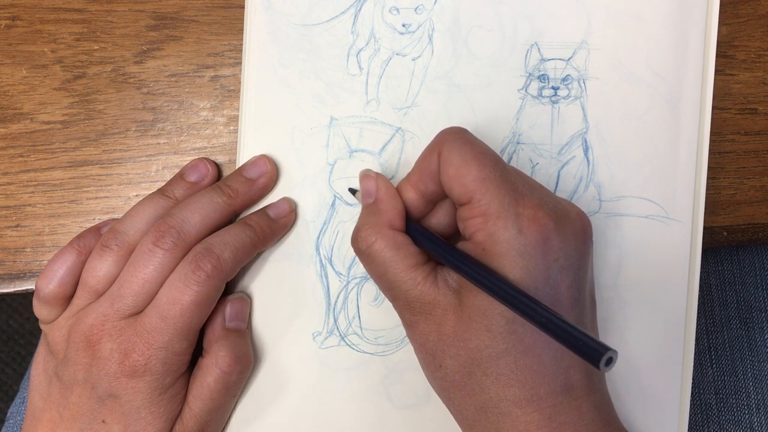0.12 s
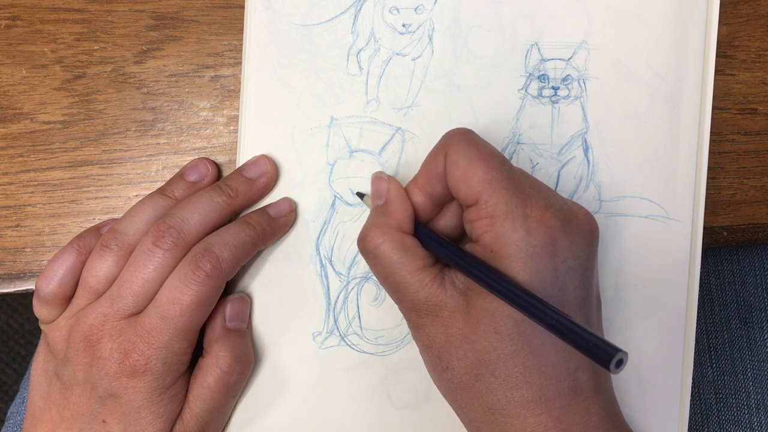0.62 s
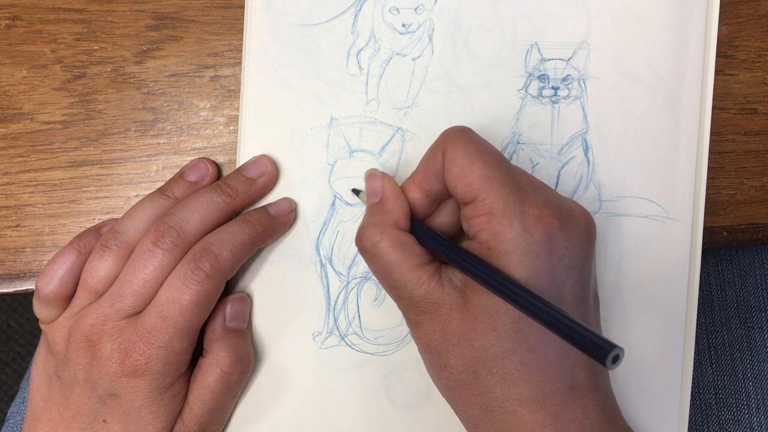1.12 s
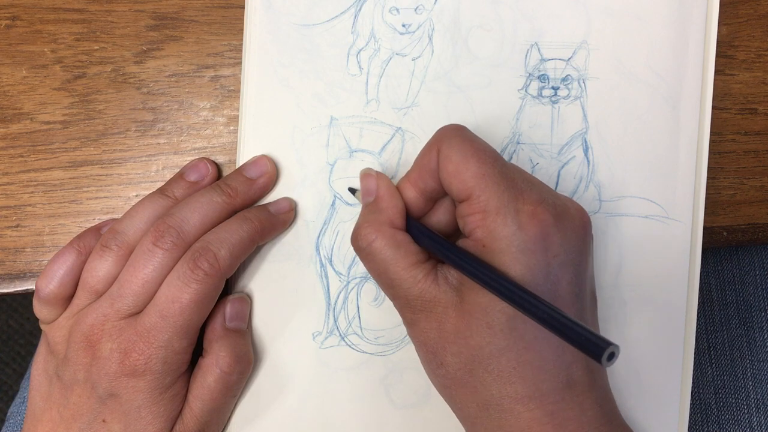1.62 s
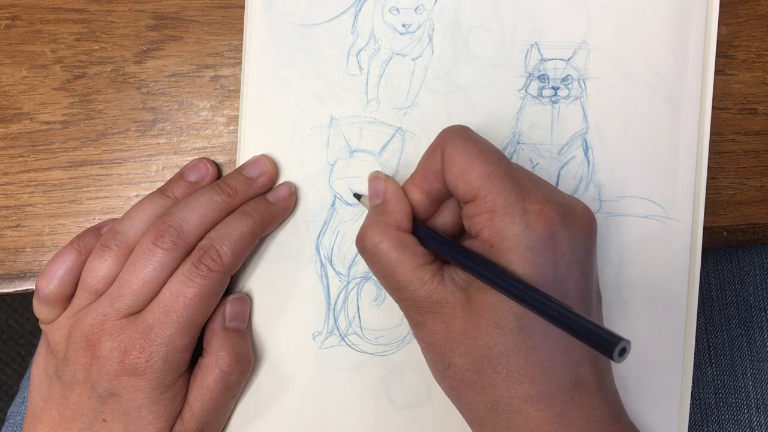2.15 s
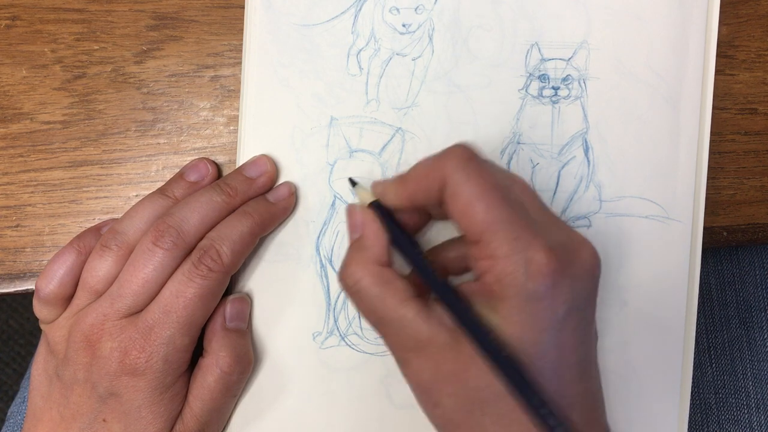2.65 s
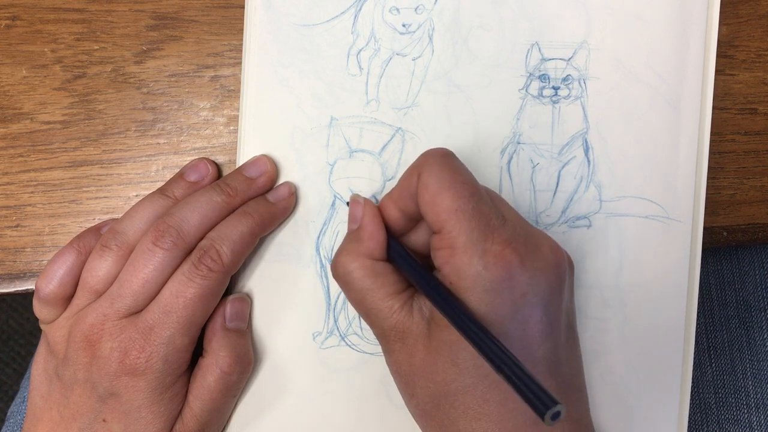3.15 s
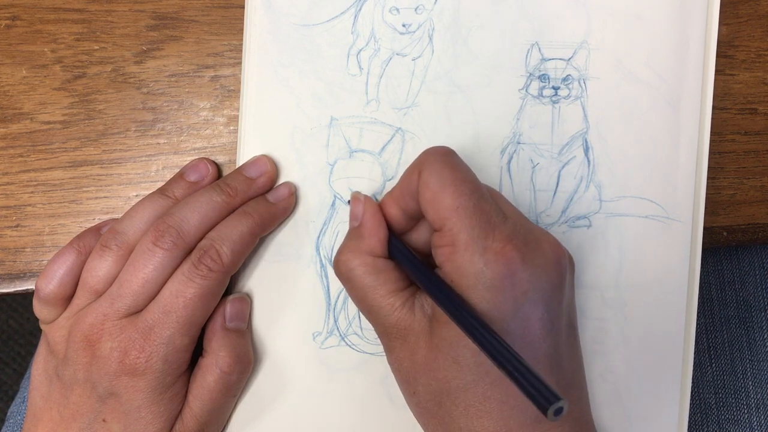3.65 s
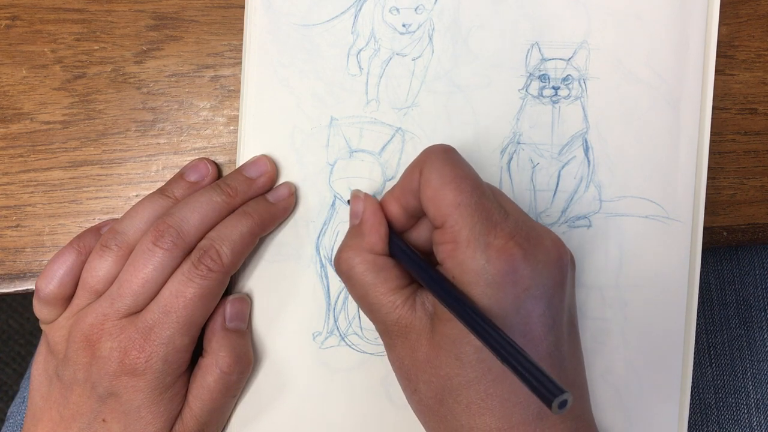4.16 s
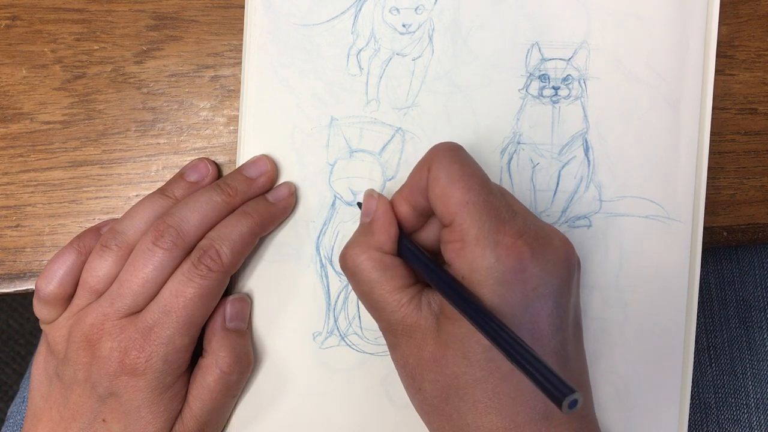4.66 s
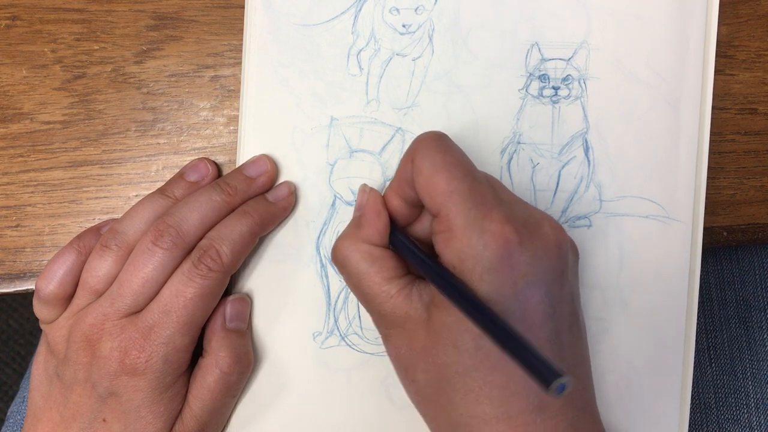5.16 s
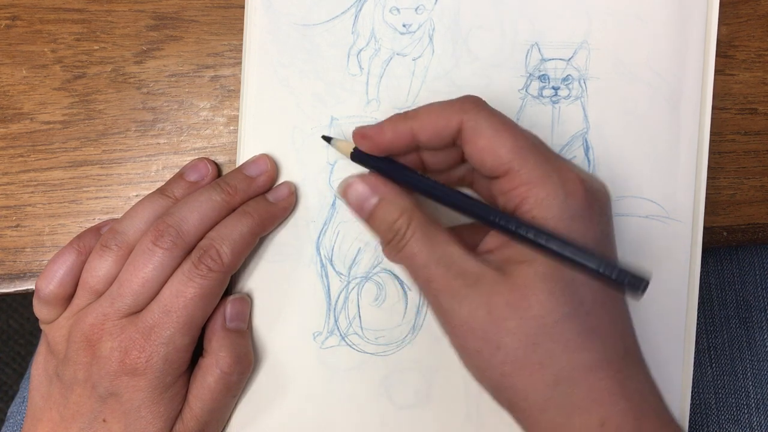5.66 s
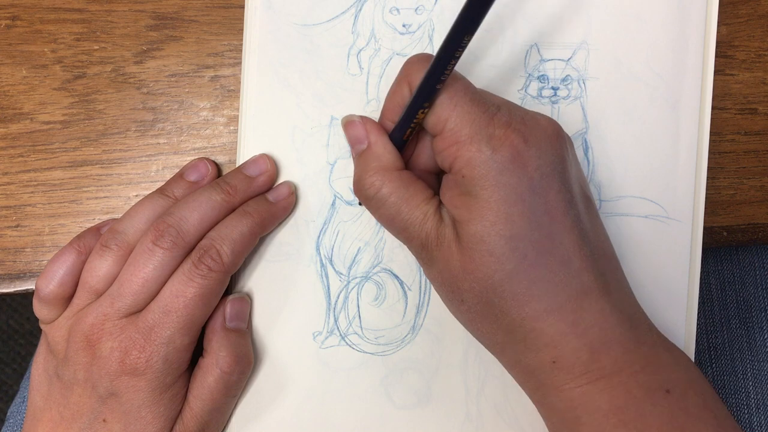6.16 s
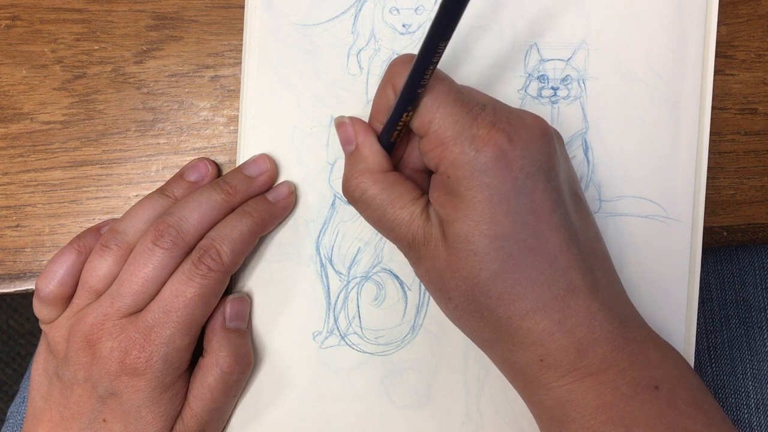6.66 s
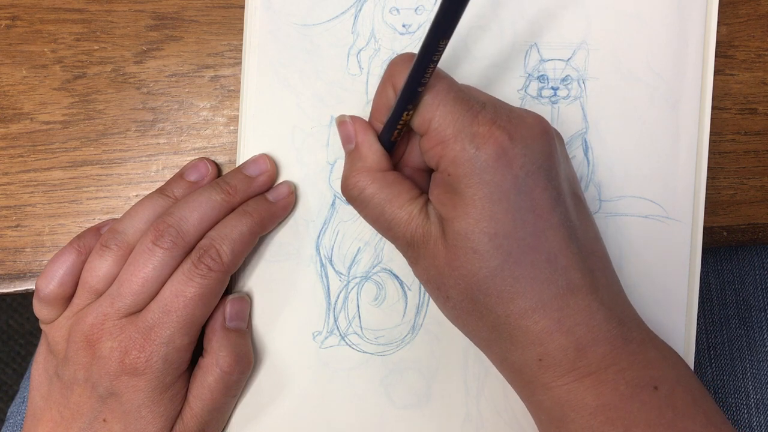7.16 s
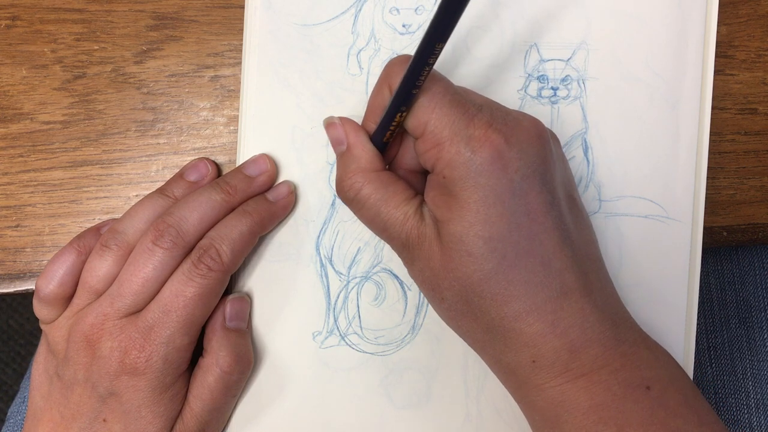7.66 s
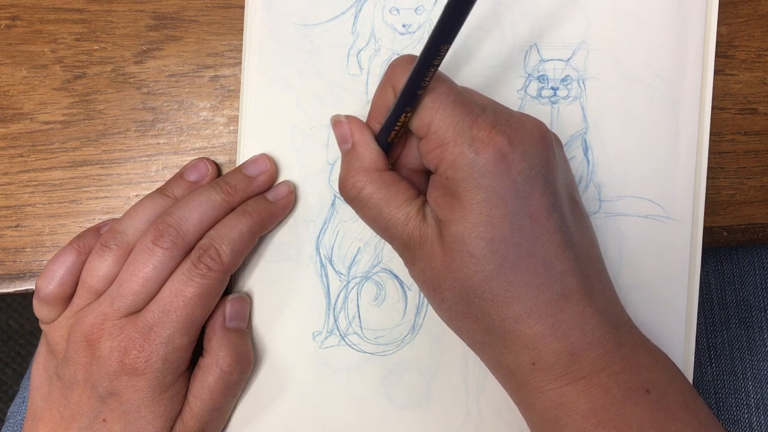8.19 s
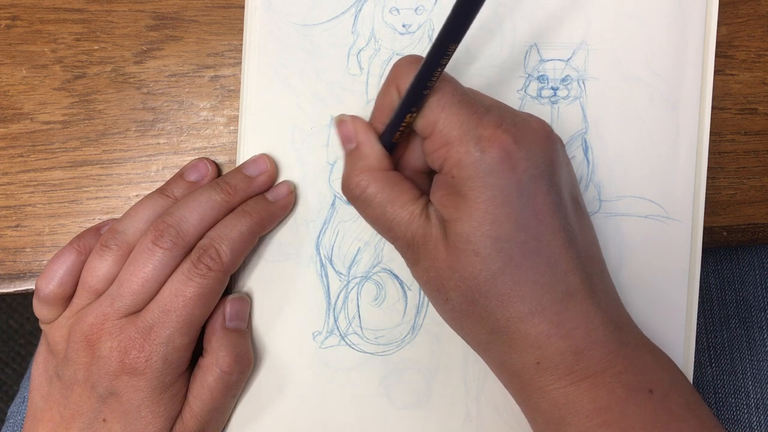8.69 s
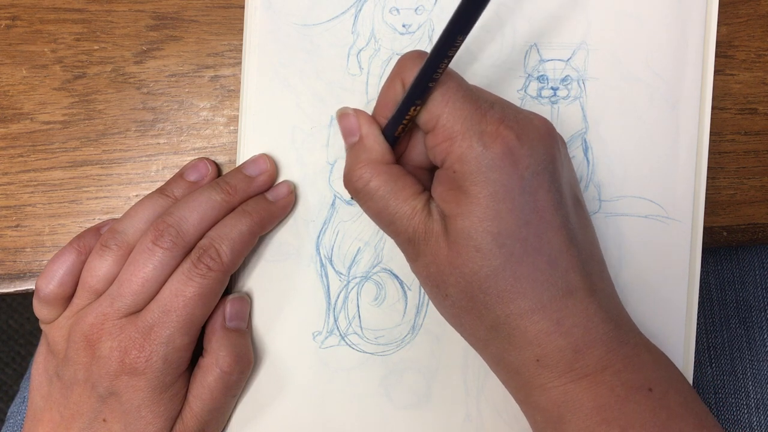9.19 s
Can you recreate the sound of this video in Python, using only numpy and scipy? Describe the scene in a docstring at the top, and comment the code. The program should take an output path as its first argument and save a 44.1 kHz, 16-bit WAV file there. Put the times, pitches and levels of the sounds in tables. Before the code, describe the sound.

A pencil makes faint dry scratches and tiny bright ticks on sketchbook paper over a steady, slowly beating low ventilation hum in a quiet room.

```python
"""A pencil sketches, a hand slides over the pad, then an eraser rubs; a phone is held just above the desk.
Rubs are dense random clicks, and the pencil's ticks single knocks with a short scrape; both excite resonances.
Ventilation fills the quiet room: a motor hum of steady sines that beats slowly, fan tones at multiples of
shaft speeds, a faint wandering whine of gliding partials, soft far pips, and duct rumble as shaped noise."""
import sys
import numpy as np
from scipy import signal
from scipy.fft import rfft, irfft, next_fast_len
from scipy.io import wavfile
from scipy.ndimage import uniform_filter1d

SR = 44100
rng = np.random.default_rng(int(sys.argv[2]) if len(sys.argv) > 2 else 0)


def put_to_file(sound):
    """Save the sound as 16-bit audio at rate SR, in the file named by the first command-line argument."""
    columns = np.atleast_2d(sound).T  # one column per channel
    safe = np.clip(columns, -1, 1)
    whole_steps = np.round(safe * 32767)
    wavfile.write(sys.argv[1], SR, whole_steps.astype(np.int16))


def makeup_ratio(level_db):
    """Linear amplitude ratio for a level in decibels (20 dB per factor of ten)."""
    decades = np.asarray(level_db, float) / 20
    return 10 ** decades


N = 410571
T = np.arange(N) / SR  # time in seconds


def ring(x, modes):
    """Modal resonance: a sum of band-pass filters, neighbours of opposite sign so that their skirts join."""
    out = 0
    for k, (hz, width_hz, db) in enumerate(modes):
        band = [hz - width_hz / 2, hz + width_hz / 2]
        sos = signal.butter(2, band, "band", fs=SR, output="sos")
        sign = (-1) ** k
        out = out + sign * makeup_ratio(db) * signal.sosfilt(sos, x)
    return out


def walk(rate):
    """Slow random modulation: levels held for 1 / rate seconds and smoothed twice, with a spread near 1."""
    hold = int(SR / rate)
    steps = np.repeat(rng.standard_normal(N // hold + 1), hold)
    smooth = uniform_filter1d(uniform_filter1d(steps, hold), hold)
    return 1.31 * smooth[:N]


def tone(hz, db):
    """Phase is the integral of frequency: a sine of db rms follows a pitch curve from a random phase."""
    cycles = np.cumsum(hz + 0 * T) / SR + rng.random()
    return np.sqrt(2) * makeup_ratio(db) * np.cos(2 * np.pi * cycles)


def rubs():
    """Stick-slip friction: pencil, hand or eraser catches on paper fibres in uneven clicks, louder when faster."""
    # Pencil strokes, a hand slide near 5.8-6.0 s, then probably eraser rubs.
    # Each row: middle in seconds, half length at half power in ms,
    # hiss level at the fastest point in dB rms, level of the pad body over the hiss in dB.
    rub_rows = [(.199, 33, -73.5, -2), (.368, 27, -71, -2), (.460, 19, -69, 0), (.630, 27, -78, -1),
                (.739, 26, -75, -2), (.885, 26, -73, -5), (1.035, 25, -74, -2), (1.124, 12, -77, 0),
                (1.221, 21, -75, -1), (1.385, 46, -75, 0), (1.514, 14, -73, -3), (1.616, 40, -78, -1),
                (1.750, 45, -72.5, -3), (1.797, 7.4, -65, 3), (2.144, 25, -73, -1), (2.238, 26, -76, -1),
                (2.337, 22, -69.5, -2), (2.631, 9, -59, -4), (2.670, 40, -67, -4), (2.755, 8, -64, -15),
                (2.785, 32, -69, -5), (2.850, 28, -66, -4.5), (3.202, 18, -67, -7), (3.331, 19, -66.5, -6),
                (3.442, 15, -69, -6), (3.549, 18, -68.5, -5), (3.737, 32, -68, -4.5), (3.903, 14, -71, -4),
                (4.000, 41, -70.5, -4), (4.138, 40, -73, -12), (4.237, 48, -76, -3), (4.431, 27, -71, -5),
                (4.683, 34, -74, -2), (4.831, 23, -74, -2), (5.128, 24, -76, -4), (5.421, 10, -61.5, -12),
                (5.699, 36, -73, -3.5), (5.820, 35, -66, -5), (5.911, 71, -60.5, -3), (6.035, 28, -73, 1),
                (6.311, 53, -75.5, -1), (6.678, 20, -70.5, -7), (6.792, 24, -75, -7), (6.954, 32, -72, -10),
                (7.235, 31, -70, -10), (7.415, 30, -72, -6), (7.699, 32, -73.5, -2), (8.017, 35, -73, -3),
                (8.367, 47, -71, -7), (8.425, 17, -71, -15), (9.002, 24, -74, -7), (9.159, 29, -71.5, -8)]
    # Hiss of the rubbed paper. Each row: centre in Hz, width in Hz, relative level in dB.
    hiss_modes = [(11500, 1500, 0), (12900, 1600, 0)]
    # Body of the rubbed pad. Each row: centre in Hz, width in Hz, relative level in dB.
    body_modes = [(3900, 2000, -9), (5700, 1300, -1), (7100, 1400, -6), (8600, 1400, 1), (9900, 1300, -3)]
    # Thin bright edge of the rubbing. Each row: centre in Hz, width in Hz, relative level in dB.
    edge_modes = [(14300, 1500, 0), (15500, 1200, 0)]
    fibres_per_s, fibre_spread_db = 15000, 1.5
    rise_share = 0.44  # the motion is fastest after this share of a rub
    steepness = 1.9  # power law of the motion's start and stop

    power = np.zeros((3, N))  # hiss, body, edge
    for middle_s, half_ms, hiss_db, body_db in rub_rows:
        near = slice(max(int((middle_s - .3) * SR), 0), int((middle_s + .3) * SR))
        rise_ms = 2 * half_ms * rise_share
        fall_ms = 2 * half_ms - rise_ms
        lag_ms = 1000 * (T[near] - middle_s) + half_ms - rise_ms  # from the fastest point
        side_ms = np.where(lag_ms < 0, rise_ms, fall_ms)
        swell = .5 ** (abs(lag_ms / side_ms) ** steepness)
        edge_db = -4 + .15 * (hiss_db + 72)  # over the hiss; louder rubs are brighter
        band_db = hiss_db + np.array([[0], [body_db], [edge_db]])
        power[:, near] += swell * makeup_ratio(band_db) ** 2

    caught = rng.random((3, N)) < fibres_per_s / SR
    uneven = makeup_ratio(fibre_spread_db * rng.exponential(size=(3, N)))
    fibres = caught * rng.standard_normal((3, N)) * uneven
    fibres = fibres * makeup_ratio(1.6 * walk(90))  # the tooth of the paper is patchy
    bands = [ring(f, modes) for f, modes in zip(fibres, (hiss_modes, body_modes, edge_modes))]
    return sum(np.sqrt(p) * b / b.std() for p, b in zip(power, bands))


def ticks():
    """Impulse response: a sharp knock with a short scrape rings tip, shaft and barrel and thuds on the pad."""
    # Ticks. Each row: start in seconds, peak of the tip's ring in dB,
    # then the peaks of shaft, barrel and pad thud over that of the tip in dB.
    tick_rows = [(0.4698, -38.5, 1, -15, -2), (1.1257, -52, 0, -14, -14), (1.2295, -55.5, 5.5, -3, -10),
                 (1.7875, -52, -10, -20, -20), (1.7932, -38.5, -7.5, -20, -14), (1.822, -55, 8, -4, -2),
                 (1.8687, -33.5, -5.5, -14.5, -11), (2.419, -48.5, 8, -9, -1.5),
                 (2.4568, -36, -7.5, -21, -23), (2.565, -46, -21, -20, -20), (2.6119, -45, -16, -11, -17),
                 (2.8806, -44, 0, -16, -6), (4.8217, -65.5, 2, 18.5, 0), (5.1045, -53, -22, -20, -20),
                 (5.3781, -45, -22, -18, -16)]
    # Bright ring of the tip. Each row: centre in Hz, width in Hz, relative level in dB.
    tip = [(10900, 2000, -10), (13100, 1400, 0), (15000, 2000, -10)]
    # Ring of the shaft. Each row: centre in Hz, width in Hz, relative level in dB.
    shaft = [(5700, 1100, 0), (7200, 1600, -9), (9000, 2000, -6)]
    # Duller ring of the barrel. Each row: centre in Hz, width in Hz, relative level in dB.
    barrel = [(1800, 250, -10), (2290, 300, 0)]
    # Dull thud of the pad. Each row: centre in Hz, width in Hz, relative level in dB.
    thud = [(800, 400, 3), (1400, 700, -1), (3200, 2400, -2)]
    scrape_db, scrape_t60_s = -20.5, 0.023  # level against the knock, time to fall by 60 dB
    desk_echo_db, desk_echo_s = -14, .0038

    out, size = np.zeros(N), int(.06 * SR)
    fade = np.exp(-np.log(1000) * T[:size] / scrape_t60_s)
    scrapes = rng.standard_normal((len(tick_rows), size))
    for (start_s, tip_db, *over_db), scrape in zip(tick_rows, scrapes):
        knock = makeup_ratio(scrape_db) * scrape * fade
        knock[0] += 1
        knock[int(desk_echo_s * SR)] += makeup_ratio(desk_echo_db)  # again by way of the desk
        rings = [ring(knock, modes) for modes in (tip, shaft, barrel, thud)]
        gains = makeup_ratio(tip_db + np.array([0, *over_db]))
        start = int(start_s * SR)
        out[start:start + size] += sum(g * r / abs(r).max() for g, r in zip(gains, rings))
    return out


def hum():
    """Beating: steady lines of close frequency drift in and out of phase, all cresting together once."""
    # Motor and mains hum; the pair near 117 Hz beats. Each row: frequency in Hz, level in dB rms.
    hum_lines = [(59.32, -32.9), (116.36, -44.5), (118.64, -49.1), (120.03, -56.5), (177.97, -59.3)]
    crest_s = .362
    return sum(np.sqrt(2) * makeup_ratio(db) * np.cos(2 * np.pi * hz * (T - crest_s)) for hz, db in hum_lines)


def fans():
    """Harmonics of rotation: multiples of two shaft speeds, one wandering a little, and a few lone tones."""
    # Lines of the steady fan. Each row: multiple of the shaft frequency, level in dB rms.
    steady_lines = [(9, -69), (10, -79.5), (15, -86), (16, -94), (34, -83.5)]
    # Lines of the wavering fan. Each row: multiple of the shaft frequency, level in dB rms.
    wavering_lines = [(7, -87), (8, -84.5), (9, -78), (14, -93), (16, -90)]
    # Other thin tones. Each row: frequency in Hz, level in dB rms.
    lone_tones = [(1070.7, -82.5), (1238.5, -91), (2022.5, -90), (2122.8, -91), (2412, -91), (2653, -91),
                  (3660, -93)]
    steady_shaft_hz, wavering_shaft_hz = 58.603, 174.73

    wander = 1 + .0003 * walk(.5)
    out = sum(tone(k * steady_shaft_hz, db) for k, db in steady_lines)
    out = out + sum(tone(k * wavering_shaft_hz * wander, db) for k, db in wavering_lines)
    return out + sum(tone(hz, db) for hz, db in lone_tones)


def whine():
    """Frequency and amplitude modulation: thin gliding partials tremble, swell together and flicker alone."""
    # Path of the whine. Each row: time in seconds, pitch of the lowest partial in Hz, swell in dB.
    whine_path = [(0, 3600, 1), (1.7, 3485, 0), (2.3, 3410, 3), (2.75, 3300, -3), (3.3, 3330, 2),
                  (4.2, 3390, -0.5), (5.1, 3550, 2.5), (6.2, 3640, 1.5), (8.2, 3304, 0.5), (9.31, 3530, 2)]
    # Partials. Each row: ratio to the lowest, level in dB rms before swell and flicker.
    partials = [(1, -83), (1.21, -94), (1.243, -90), (1.275, -88), (1.31, -90.5)]

    path_s, path_hz, path_db = np.transpose(whine_path)
    glide_hz = np.interp(T, path_s, path_hz)
    swell_db = np.interp(T, path_s, path_db)
    out = 0
    for ratio, db in partials:
        tremble = 1 + .003 * walk(25)
        flicker_db = 2.2 * walk(12)
        out = out + tone(ratio * glide_hz * tremble, db + swell_db + flicker_db)
    return out


def pips():
    """Tone bursts: sines under Gaussian envelopes make brief faint pips far off."""
    # Pips. Each row: middle in seconds, frequency in Hz, time from crest to 1/e in seconds,
    # level of the sine at the crest in dB rms.
    pip_rows = [(7.97, 1190, .05, -72), (8.42, 1305, 0.087, -75), (8.83, 1005, 0.023, -68)]
    return sum(tone(hz, db) * np.exp(-((T - s) / length_s) ** 2) for s, hz, length_s, db in pip_rows)


def air():
    """Spectral shaping: white noise takes the smooth colour of air in the ducts and microphone hiss."""
    # Spectrum of duct air and microphone hiss. Each row: frequency in Hz, power density in dB per Hz.
    air_spectrum = [(15, -96), (22, -87), (30, -72), (36, -60.5), (42, -54), (50, -58), (70, -62),
                    (85, -60.5), (100, -66), (135, -63.5), (150, -65), (168, -71.5), (195, -68.5),
                    (235, -78), (272, -77), (310, -86), (350, -88), (400, -91), (480, -94), (600, -90),
                    (680, -100), (900, -100), (1050, -98), (1300, -102), (1700, -104), (2100, -102),
                    (2600, -101), (3000, -104), (3600, -103.5), (3950, -106.5), (4500, -107.5),
                    (4950, -111.5), (5600, -109.5), (6500, -112), (7700, -116), (9000, -113.5),
                    (10400, -116.5), (11500, -112), (13500, -113), (16000, -115)]
    size = next_fast_len(N)
    hz, db = np.transpose(air_spectrum)
    bins_hz = np.maximum(np.arange(size // 2 + 1) * SR / size, 1)
    density_db = np.interp(np.log(bins_hz), np.log(hz), db)
    colour = makeup_ratio(density_db) * np.sqrt(SR / 2)  # unit white noise spreads its power over SR / 2
    return irfft(rfft(rng.standard_normal(size)) * colour, size)[:N]


def scene():
    """Superposition: the rubs and ticks close by and the machinery all around add in one channel."""
    return (rubs() + ticks() + hum() + fans() + whine() + pips() + air())[None]


def roll_off(x):
    """The treble ends steeply here."""
    return signal.sosfilt(signal.butter(12, 16510, fs=SR, output="sos"), x)


def record(dry):
    """Band limiting: the phone's steep elliptic low-pass cuts the top of the spectrum."""
    top_hz, ripple_db, stop_db = 15830, .3, 50
    low_pass = signal.ellip(10, ripple_db, stop_db, top_hz, fs=SR, output="sos")
    mix = signal.sosfilt(low_pass, dry)
    return roll_off(mix)


dry = scene()
out = record(dry)
put_to_file(out)
```